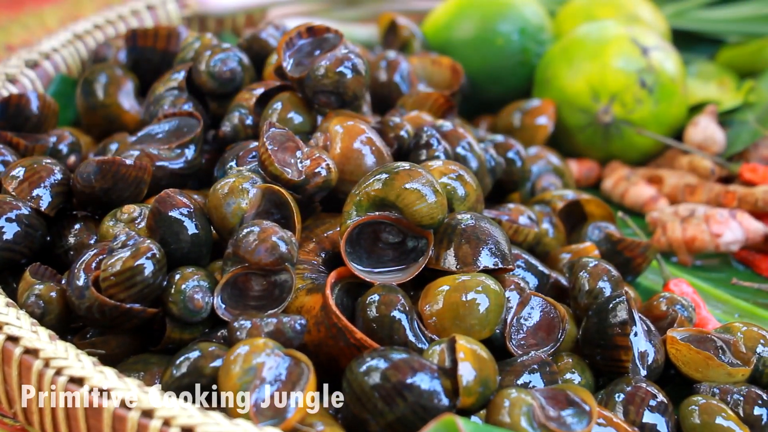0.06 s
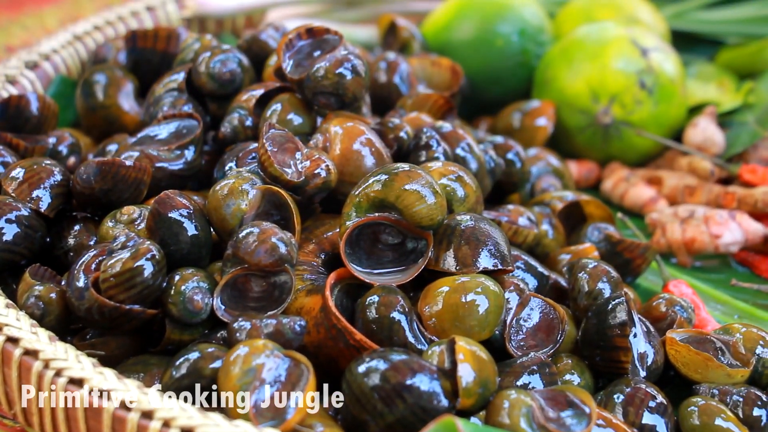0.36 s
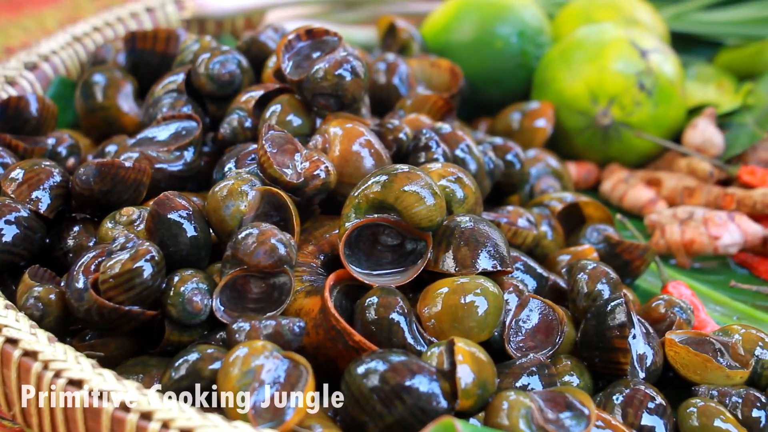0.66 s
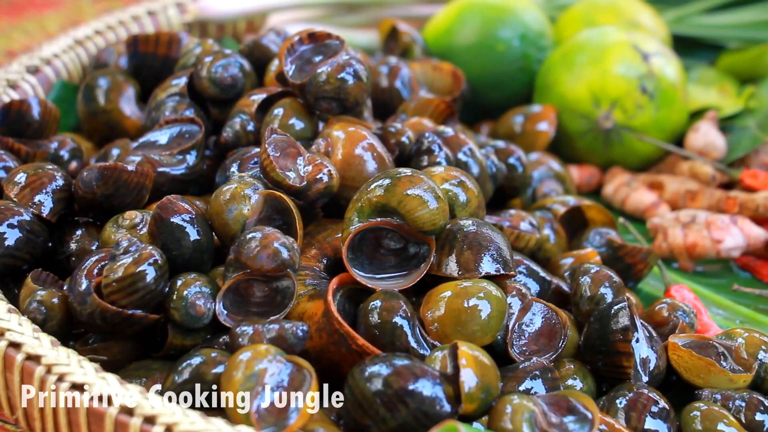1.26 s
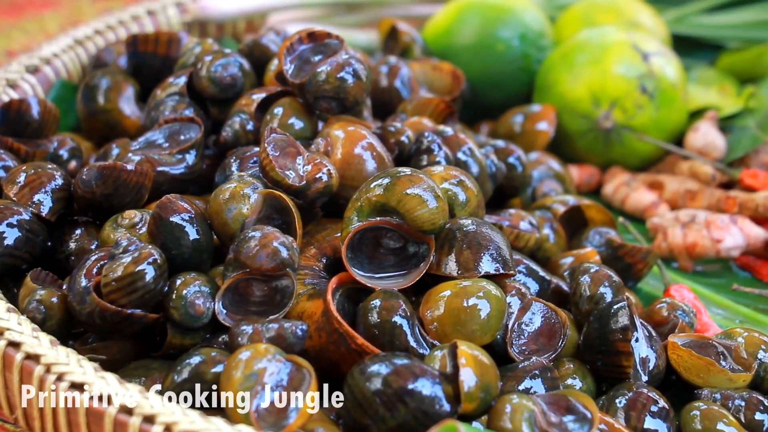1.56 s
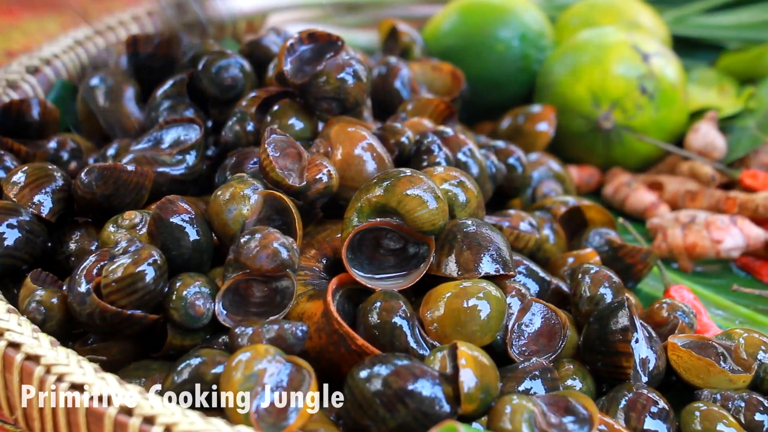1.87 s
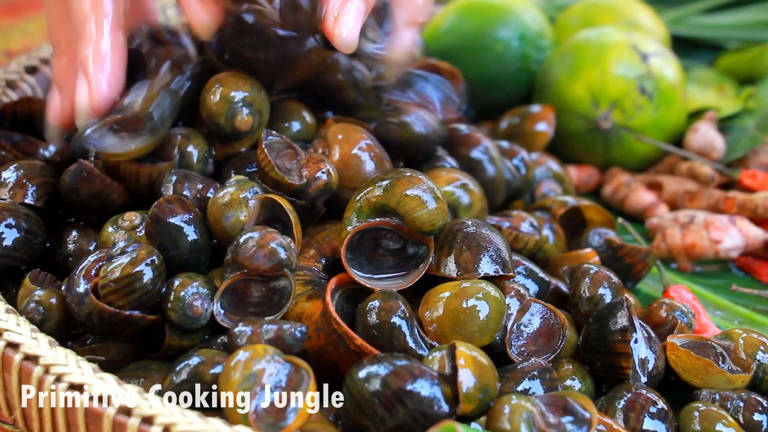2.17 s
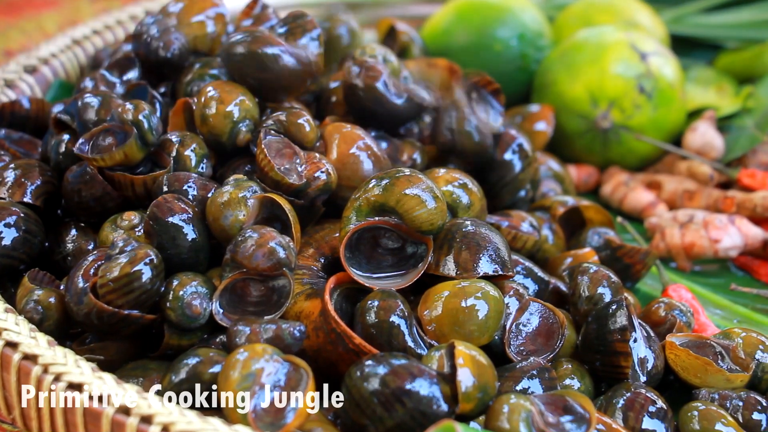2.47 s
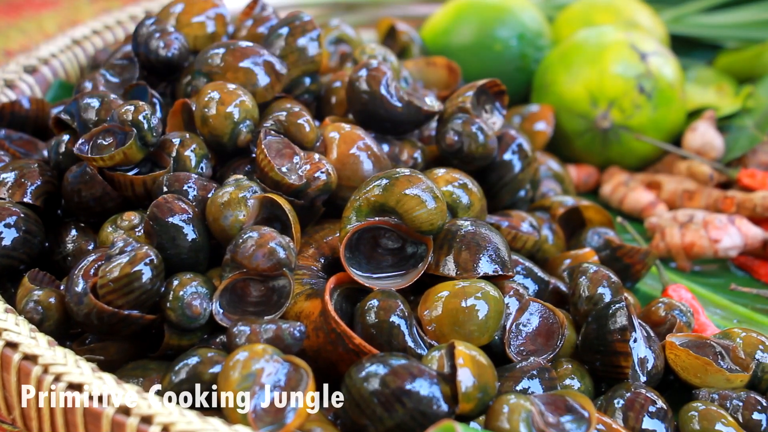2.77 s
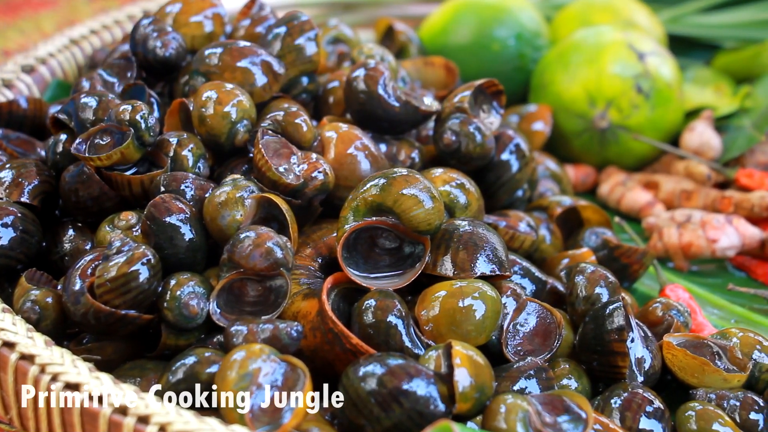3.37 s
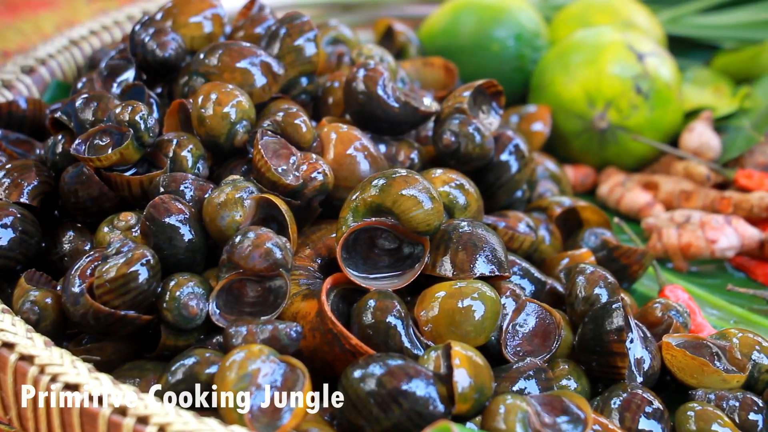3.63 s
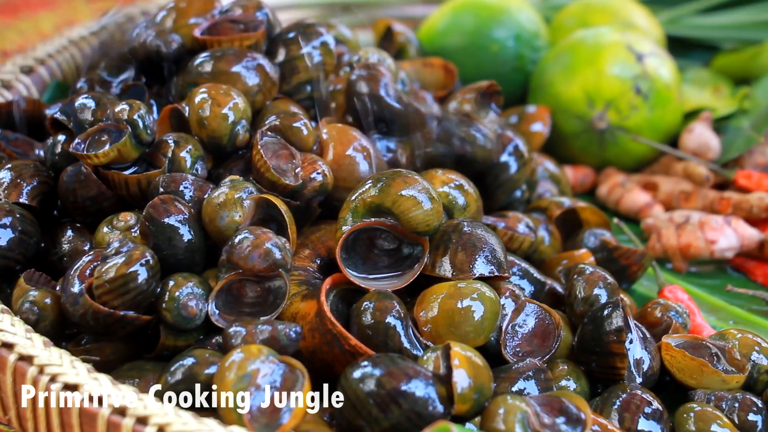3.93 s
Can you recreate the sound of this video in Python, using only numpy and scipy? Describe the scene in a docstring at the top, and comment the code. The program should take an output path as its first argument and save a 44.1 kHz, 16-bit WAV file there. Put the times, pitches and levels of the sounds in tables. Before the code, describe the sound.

Close up, wet snail shells clack onto a pile in a basket, after dull bumps and squelches of rummaging in a tub. A few more bumps and small pops follow, then another handful starts landing, over a low background noise.

```python
"""Wet snails, from tub to basket

Close on one microphone, a hand scoops snails out of a tub, where they knock dully, and drops them on
a heap of shells in a basket. The shells clack and settle, water pops between them, then a second
handful starts to fall. Around them: a short reverberation, a low background, faint far-off whistles."""
import sys
import numpy as np
from scipy import signal
from scipy.fft import rfft, irfft
from scipy.io import wavfile

SR = 44100
rng = np.random.default_rng(int(sys.argv[2]) if len(sys.argv) > 2 else 0)


def wrap_up_sound(samples):
    """Save the sound to the file named by the first command line argument, as 16-bit audio."""
    columns = np.atleast_2d(samples).T
    # keep every value between -1 and 1, then stretch to whole-number steps
    tamed = np.clip(columns, -1, 1)
    steps = np.round(tamed * 32767).astype(np.int16)
    wavfile.write(sys.argv[1], SR, steps)


N = 176400
T = np.arange(4096) / SR  # time within one contact, s

# Shells landing in the basket, close up: t/s, level/dB, ring f/Hz, relative treble/dB
LANDINGS = [(0.6386, -9, 3820, -20), (0.8959, -4, 4040, -14), (1.7968, -6, 3800, -15.5),
            (1.8243, -11.5, 3020, -35), (1.8413, -13.5, 1710, -32), (1.9109, 4.5, 2100, -11.5),
            (1.9397, -5.5, 3150, -19), (1.9477, -2, 4300, -17.5), (1.9668, -21, 3500, -28),
            (1.9718, 4, 2780, -14), (1.989, -3.5, 7560, -13), (2.0103, -2, 7950, -14),
            (2.0206, -10, 2290, -13), (2.0745, -7.5, 2830, -33), (2.1151, -8.5, 2900, -15),
            (2.142, -0.5, 4200, -20.5), (2.1932, -8, 3900, -21), (2.2173, -3.5, 2900, -13),
            (2.2294, -7, 3920, -20), (2.2366, -6, 6200, -1), (2.249, -16, 6140, -1), (2.2565, -2, 1530, -9),
            (2.2644, -10, 3680, -15), (2.2844, 0, 2020, -10), (2.4087, -2.5, 2280, -32.5),
            (2.4658, -11.5, 6200, -14), (2.4933, -9.5, 2250, -27), (2.5133, -5, 8500, -11.5),
            (2.5615, -12, 1950, -23), (2.599, -12.5, 2530, -17), (2.6292, -9, 4130, -31.5),
            (3.7946, -5, 10700, -15), (3.8366, -0.5, 2830, -14), (3.8567, 2.5, 2720, -16),
            (3.8842, -6, 2690, -19), (3.896, -3, 4040, -12.5), (3.9018, -1.5, 4550, -19),
            (3.9545, -1.5, 9100, -9), (3.983, -2, 3280, -10)]
# Small shells tumbling, one curve per handful: t/s, level/dB
HANDFULS = [
    [(1.91,-23.5),(1.94,-34),(2.01,-24),(2.11,-21),(2.18,-32),(2.255,-18),(2.31,-34.5),(2.68,-71)],
    [(3.84,-42),(3.87,-28.5),(3.94,-42.5),(4.05,-84)],
]
# Early reflections off heap and basket: delay t/s, level/dB
BASKET_ECHOES = [(.0022,-19),(.007,-26.5),(.0098,-28)]


def heap():
    """Shells land and tumble in the basket; their neighbours throw the sound back."""
    tumble = swarm(lambda: clack(rng.lognormal(np.log(2700), 0.445), rng.normal(-23, 2.3)),
                   per_s=240, scatter_db=12)
    falling = sum(level(handful, outside=-np.inf) for handful in HANDFULS)
    direct = play(LANDINGS, clack) + falling * tumble
    out = direct.copy()
    for delay, db in BASKET_ECHOES:
        add(out, delay, amp(db) * direct)
    return out


def clack(hz, treble_db):
    """Shell on shell: a hard crack and a very short, loosely pitched ring."""
    hollow = amp(-1) * band(hz) * fade(t60=0.008)
    return peaked(crack(treble_db + 15.5) * fade(t60=0.008) + hollow)


# Spectra of a struck shell, body and treble: f/Hz, level/dB
BODY_SPECTRUM = [(150,-12.5),(1400,-5),(3100,0),(4400,1),(5400,-43),(9000,-53)]
TREBLE_SPECTRUM = [(3000,-55),(5300,-7.5),(6300,11),(10200,-2.5),(12500,-9.5),(14000,-16),(16000,-26)]


def crack(treble_db):
    """The broad colour of a shell surface, with more or less treble."""
    return noise(BODY_SPECTRUM, len(T)) + amp(treble_db) * noise(TREBLE_SPECTRUM, len(T))


# Shells bumping in the tub or pressed together by the hand: t/s, level/dB, ring f/Hz, relative edge/dB
BUMPS = [(0.088, -14.5, 1380, -9.5), (0.119, -7.5, 1490, -16), (0.126, -4.5, 1560, -37),
         (0.243, -3.5, 880, -35), (0.251, -6, 1410, -21), (0.319, -4.5, 875, -25), (0.368, -9, 855, -22.5),
         (0.385, -6.5, 860, -35), (0.407, -5, 640, -34), (0.453, -23, 780, -33), (0.462, -6.5, 760, -27),
         (0.508, -4, 866, -42), (0.567, -5, 1480, -14), (0.717, -1.5, 600, -13), (0.788, -2, 823, -42),
         (0.822, -2.5, 630, -9), (0.836, -3, 647, -8.5), (0.978, -7.5, 1430, -1.5), (1.072, -1.5, 920, -10),
         (1.087, -2.5, 630, -14), (1.098, -7, 930, 7), (1.508, -7.5, 630, -24), (1.107, -8, 1560, -3),
         (2.773, -12, 1490, -11.5), (2.780, -10.5, 406, -32), (2.808, -21, 490, -26),
         (2.892, -10.5, 890, -41), (2.947, -17, 960, -35), (3.477, -11, 1244, -3.5)]
# Stirring in the tub: t/s, level/dB
STIR_LEVEL = [(0,-30.5),(.2,-26),(.38,-19.5),(.55,-22),(.63,-24.5),(.75,-20),(.86,-33),(1.02,-31),(1.12,-44),(2.74,-47.5),(2.78,-27),(2.9,-30.5),(3.02,-41.5),(3.8,-48)]


def tub():
    """The hand rummages among the snails, near the microphone."""
    stir = swarm(lambda: knock(rng.lognormal(np.log(1050), 0.244), rng.normal(-25.5, 3.1)),
                 per_s=200, scatter_db=11)
    return play(BUMPS, knock) + level(STIR_LEVEL) * stir


# Spectrum of a thud in the tub: f/Hz, level/dB
THUD_SPECTRUM = [(100,-31),(330,-22),(600,-5),(900,-3.5),(1150,-12.5),(1550,-5),(2200,-14.5),(4000,-32),(7000,-56),(14000,-82)]
# Resonances of the tub: f/Hz, level/dB, t60/s
TUB_RESONANCES = [(646,-14,0.076),(848,-16.5,0.089)]


def knock(hz, edge_db):
    """A dull bump: the shell's hollow ring, the tub's modes and a short hard edge."""
    modes = sum(rng.normal() * amp(db) * ring(f, t60, attack=0.0016) for f, db, t60 in TUB_RESONANCES)
    thud = noise(THUD_SPECTRUM, len(T)) * fade(t60=0.026, attack=0.0002)
    edge = amp(edge_db + 3.5) * crack(treble_db=-9.5) * fade(t60=0.012)
    hollow = amp(3) * ring(hz, t60=0.026, attack=0.0013)
    return peaked(thud + edge + modes + hollow)


# Water films and bubbles popping between the shells: t/s, level/dB, f/Hz, t60/s
FILM_POPS = [(1.1775,-12.5,3400,0.023),(1.205,2.5,1527,0.013),(1.302,-18.5,2170,.05),(1.4465,-11,1430,0.01),(1.5351,-13,4300,0.015),(1.7775,-16.5,1980,0.015),(3.1383,-24,2050,0.037),(3.1638,-23,1050,.045),(3.2879,-17,2380,0.018),(3.3275,-24.5,1450,.06),(3.4944,-16,3230,0.017),(3.5546,-15,6000,0.0073),(3.6175,-13.5,1610,0.025)]
# Wet crackle of the handful: t/s, level/dB
SQUELCH_LEVEL = [(.55,-39),(.72,-33),(.98,-25),(1.1,-32.5),(1.15,-43),(1.37,-39.5),(1.7,-43.5),(2.7,-48.5),(3.25,-40.5),(3.42,-47),(3.5,-39),(3.7,-46)]


def water():
    """Single pops over a wet squelching, heard from close by."""
    squelch = swarm(lambda: squish(rng.lognormal(np.log(2970), 0.35)), per_s=230, scatter_db=20)
    return play(FILM_POPS, pop) + level(SQUELCH_LEVEL) * squelch


def pop(hz, t60):
    """A film snaps and the cavity behind it rings, rising in pitch, with a splash around that pitch."""
    splash = band(hz) + amp(-4) * band(hz / 2) + amp(-9) * band(min(2 * hz, 9000))
    cavity = ring(hz * (1 + 6 * T), t60, attack=0.00053)
    return peaked(cavity + amp(-6.5) * splash * fade(t60, attack=0.00085))


def squish(hz):
    """Wet shells part, now and then with a dry tick, and water spurts through with a little fizz."""
    spurt = band(hz) + band(hz / 2) / 2
    fizz = amp(-12.5) * band(rng.uniform(3900, 10700))
    tick = amp(4) * rng.random() ** 3 * crack(treble_db=-7) * fade(t60=0.004)
    return peaked((spurt + fizz) * fade(t60=0.021, attack=0.002) + tick)


# Reverberation of the space around tub and basket: f/Hz, t60/s
ROOM_DECAY = [(200,0.17),(2000,0.075),(12000,0.091)]


def room(x, count=40):
    """A short diffuse tail, a little different from moment to moment."""
    wet = np.zeros(N)
    for k, piece in enumerate(np.array_split(x, count)):
        hz, t, spectra = signal.stft(rng.standard_normal(SR // 4), SR, nperseg=256)
        decay = amp(-60 * t / along(ROOM_DECAY, hz)[:, None])
        tail = signal.istft(spectra * decay, SR, nperseg=256)[1]
        add(wet, k * N / count / SR, signal.fftconvolve(piece, tail / np.linalg.norm(tail)))
    return wet


# Whistles far from the microphone: t/s, starting f/Hz
FAR_WHISTLES = [(0.019,2740),(3.141,4660),(3.179,4650),(3.66,2700)]


def whistles(fall_per_s=7.9):
    """Short, slightly ragged falling whistles, perhaps birds."""
    track = np.zeros(N)
    for s, hz in FAR_WHISTLES:
        pitch = hz * (np.exp(-fall_per_s * T) + 0.17 * rng.standard_normal(len(T)))
        phase = 2 * np.pi * np.cumsum(pitch) / SR
        add(track, s, amp(-40) * np.sin(phase) * peaked(fade(t60=0.08, attack=0.05)))
    return track


# Spectrum of the place's background: f/Hz, level/dB
AMBIENCE_SPECTRUM = [(20,-2.5),(145,1),(195,-7.5),(350,-5),(700,-12.5),(1500,-35),(4300,-25.5),(5400,-31.5),(8000,-30),(16000,-38.5)]
# Its slow drift: t/s, level/dB
AMBIENCE_LEVEL = [(0,-39.5),(1.85,-36),(2.05,-41),(2.68,-42),(2.82,-34.5),(4,-36.5)]


def ambience():
    """A low, nearly steady noise behind the snails."""
    return level(AMBIENCE_LEVEL) * noise(AMBIENCE_SPECTRUM, N)


# Noise floor of each channel: f/Hz, level/dB
FLOOR_SPECTRUM = [(30,34.5),(800,-21),(15000,7.5)]


def noise_floor():
    """Faint hiss and rumble, separate in left and right."""
    return np.array([noise(FLOOR_SPECTRUM, N), noise(FLOOR_SPECTRUM, N)])


def amp(db):
    """Decibels to gain."""
    return 10 ** (np.asarray(db) / 20)


def unit(x):
    """Scale to rms 1."""
    return x / np.sqrt(np.mean(x ** 2) + 1e-20)


def peaked(x):
    """Scale to peak 1."""
    return x / np.abs(x).max()


def along(points, hz):
    """Interpolate (Hz, value) points on a log frequency axis."""
    f, values = np.transpose(points)
    return np.interp(np.log(hz + 1), np.log(f + 1), values)


def level(points, outside=None):
    """Gain per sample from (s, dB) points; held beyond the ends unless a level is given for outside."""
    return amp(np.interp(np.arange(N) / SR, *np.transpose(points), left=outside, right=outside))


def noise(spectrum, size):
    """Coloured noise of rms 1."""
    gain = amp(along(spectrum, np.fft.rfftfreq(size, 1 / SR)))
    return unit(irfft(rfft(rng.standard_normal(size)) * gain, size))


def band(hz):
    """Noise of rms 1 gathered around one pitch."""
    f = np.fft.rfftfreq(len(T), 1 / SR) + 1
    rolloff = (1 + (4 * np.log(f / hz)) ** 2) ** 2
    return unit(irfft(rfft(rng.standard_normal(len(T))) / rolloff))


def fade(t60, attack=0.0001):
    """Quick rise and exponential decay, both times in seconds."""
    return amp(-60 * T / t60) * (1 - np.exp(-T / attack))


def ring(hz, t60, attack):
    """One damped mode."""
    return np.sin(2 * np.pi * hz * T) * fade(t60, attack)


def add(track, s, sound):
    """Mix a sound in at time s."""
    i = max(0, int(s * SR))
    track[i:i + len(sound)] += sound[:max(0, N - i)]


def play(table, voice):
    """One sound for each row."""
    track = np.zeros(N)
    for s, db, *shape in table:
        add(track, s, amp(db) * voice(*shape))
    return track


def swarm(voice, per_s, scatter_db, count=60):
    """Many light contacts at random moments, rms 1."""
    kinds = [voice() for _ in range(count)]
    track = np.zeros(N)
    for k, (lag, softness) in enumerate(rng.random((int(per_s * N / SR), 2))):
        gain = np.sign(rng.normal()) * amp(-scatter_db * np.sqrt(softness))
        add(track, (k + 2 * lag) / per_s, gain * kinds[rng.integers(count)])
    return unit(track)


def scene():
    """Heap, tub and water up close, the place behind; both channels alike but for the noise floor."""
    background = ambience()
    snails = heap() + tub() + water()
    floor = amp(-50.5) * noise_floor()
    return snails + amp(-7) * room(snails) + whistles() + background + floor


def record(dry):
    """The loudest hits clip, and the top of the treble is cut off."""
    top_hz = 16200
    passband = np.fft.rfftfreq(N, 1 / SR) < top_hz
    return irfft(rfft(np.clip(dry, -1, 1)) * passband, N)


dry = scene()
out = record(dry)
wrap_up_sound(out)
```